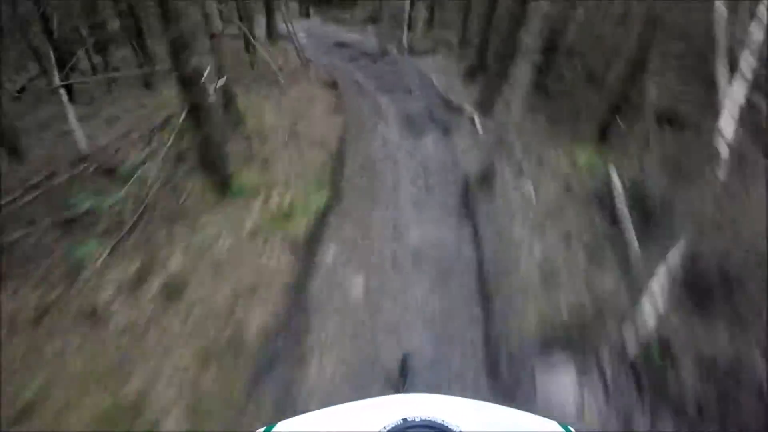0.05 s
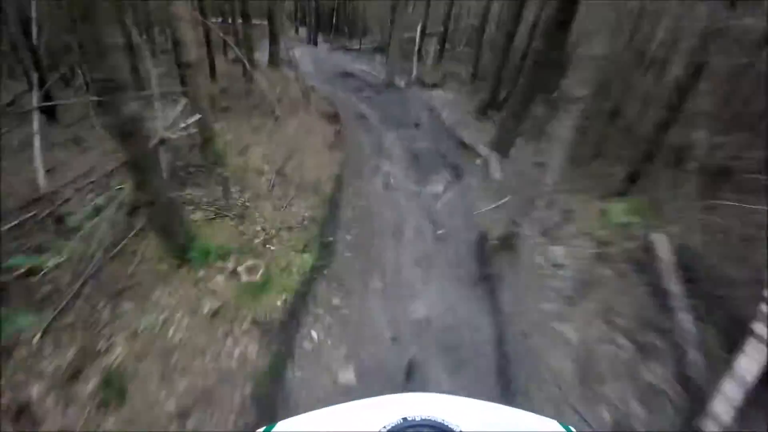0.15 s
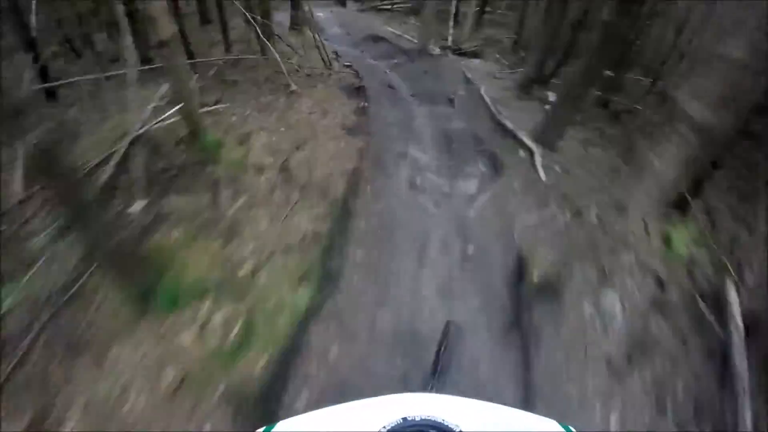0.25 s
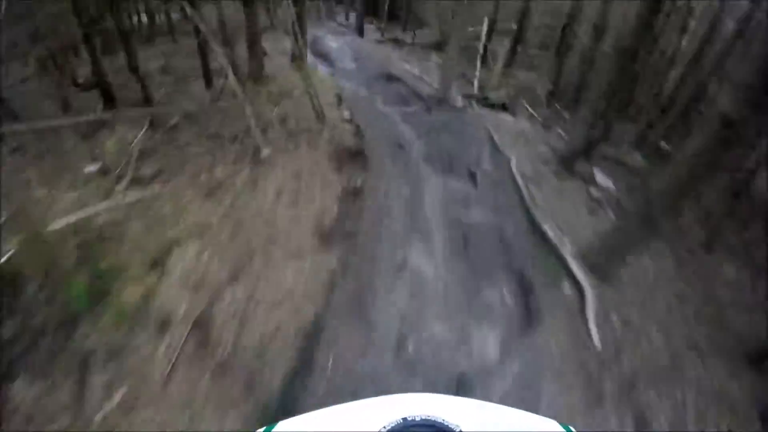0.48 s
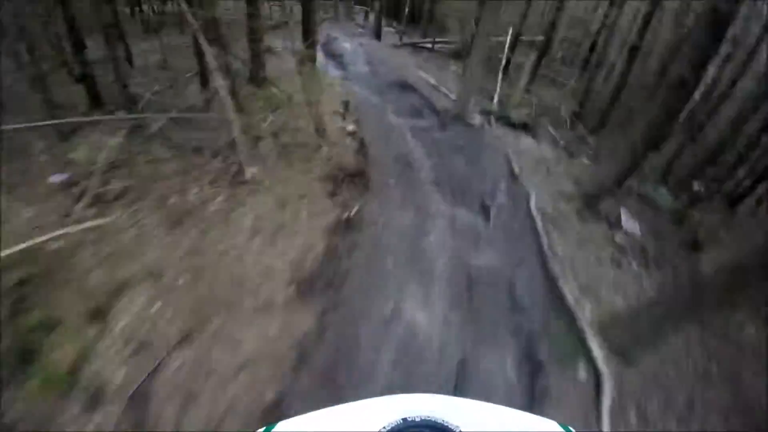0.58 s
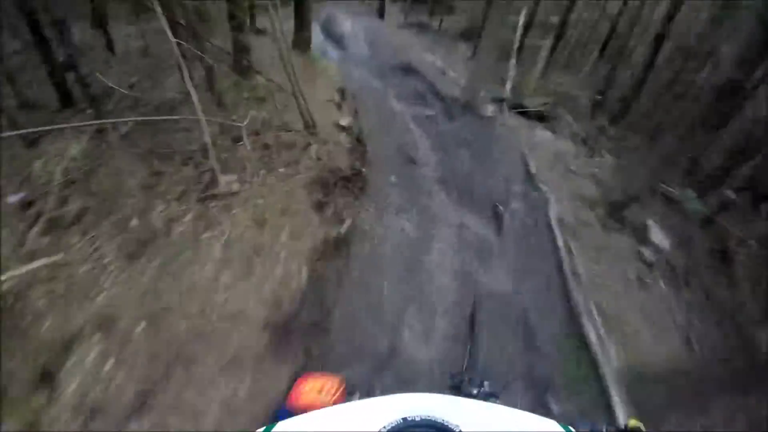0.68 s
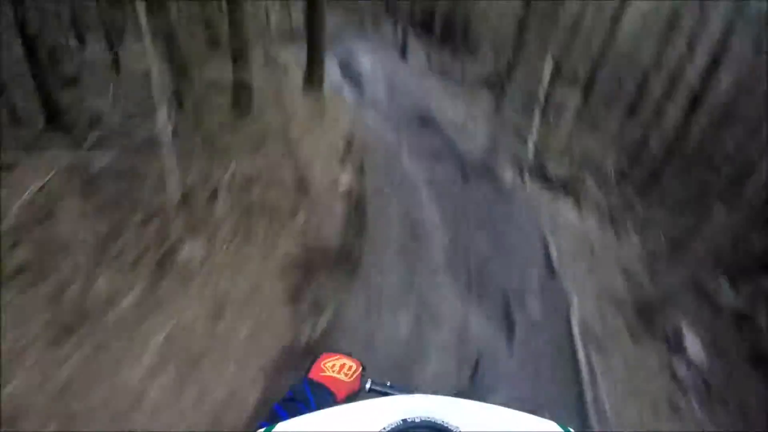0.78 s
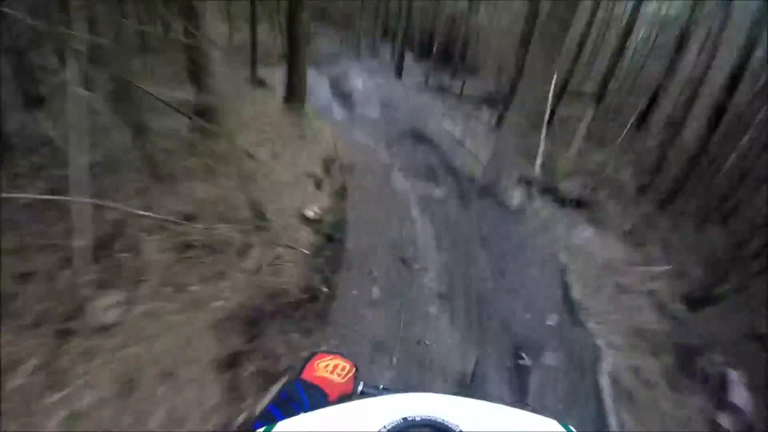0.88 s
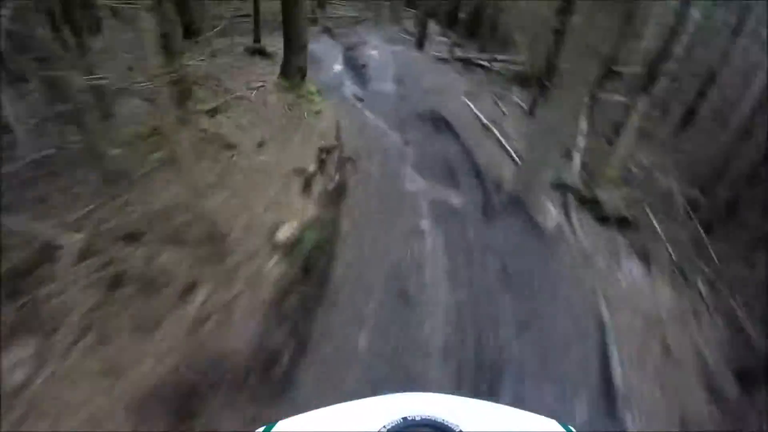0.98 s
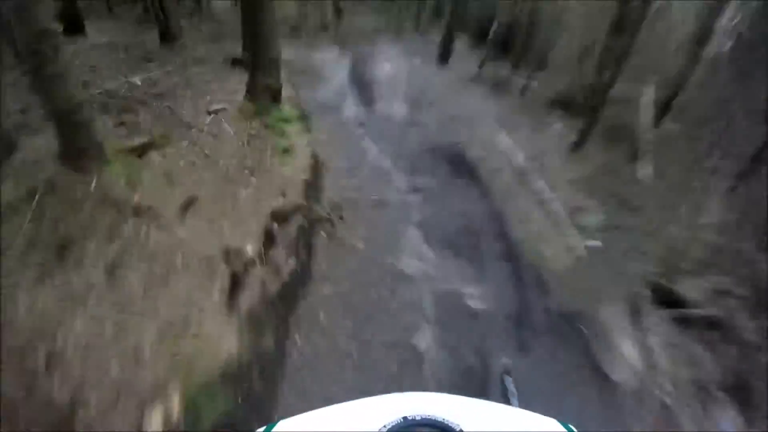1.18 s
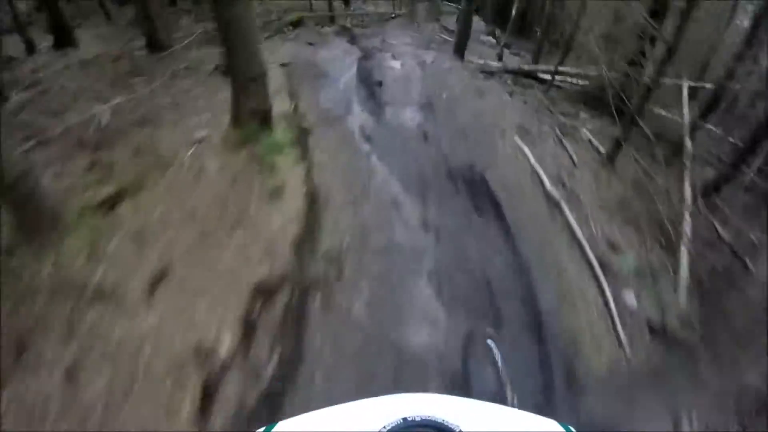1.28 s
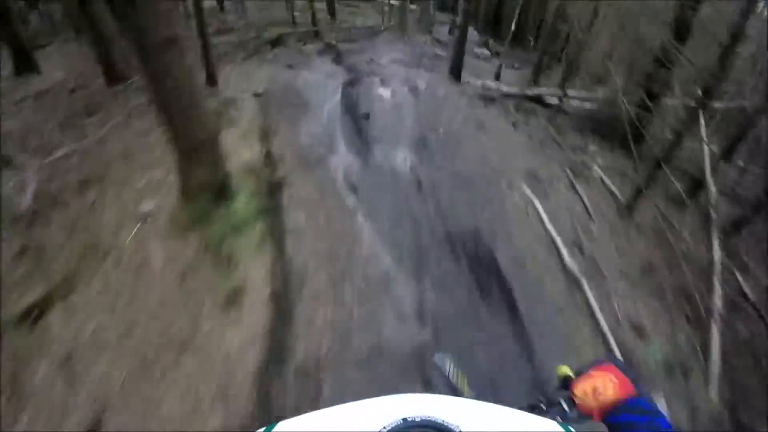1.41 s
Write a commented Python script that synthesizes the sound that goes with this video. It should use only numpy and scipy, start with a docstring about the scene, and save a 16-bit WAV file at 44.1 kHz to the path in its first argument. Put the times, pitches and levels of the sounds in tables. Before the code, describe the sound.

A mountain bike rattles and clacks down a dirt trail, with tyre hiss and wind.

```python
"""A mountain bike rattles down a dirt trail, heard from a camera on the rider's helmet.
Chain, cables and fittings strike the frame over bumps; metal scrapes once and pings once.
The tyres hum on their knobs and hiss, swish and scuff over grit. Wind buffets the camera.
Short resonances of the camera case colour the clacks, hiss, swish and grit."""
import sys
import numpy as np
from scipy import signal
from scipy.fft import rfft, irfft
from scipy.io import wavfile

SR = 44100
rng = np.random.default_rng(int(sys.argv[2]) if len(sys.argv) > 2 else 0)


def store_wav(level_fs):
    """Save 16-bit WAV to argv[1]."""
    pcm = np.round(np.clip(np.atleast_2d(level_fs), -1, 1) * 32767)
    wavfile.write(sys.argv[1], SR, pcm.T.astype(np.int16))


N = 63945
TIME_S, FREQ_HZ = np.arange(N) / SR, np.fft.rfftfreq(N, 1 / SR)

# Hard and light strikes on the frame. Each row: start in seconds, body, treble and top in relative dB.
CLACKS = [(.1276, -8, -21, -10), (.1302, -47, -40, -43), (.1314, -19, -31, -19), (.2018, -19, -27, -46),
          (.8004, -16.5, -21, -64), (.8042, -15, -24.5, -25), (.8067, -29, -51, -52),
          (.8083, -17.5, -25.5, -69), (.8107, -24, -30, -50), (.8128, -22, -35, -44),
          (.9406, -15, -21, -19.5), (1.1273, -10, -14, -23), (1.1871, -11.5, -14, -12)]
TICKS = [(.0388, -49, -51, -29), (.7463, -38.5, -33, -29), (.7742, -35, -31.5, -31),
         (.8811, -35, -31, -21.5), (1.0697, -35, -37, -23), (1.1031, -36, -30.5, -18),
         (1.3867, -31.5, -28, -21.5), (1.4367, -33, -27.5, -20)]
# Strike band edges in Hz: body end, treble start, treble end, top start.
STRIKE_EDGES_HZ = (3780, 6500, 7040, 9600)
# Metal scrape: start in seconds, length in seconds, level in dB.
SCRAPE = (0.2875, 0.064, -43)
# Ping at a hard bump: start in seconds, length in seconds, level in dB, pitch in Hz.
PING = (1.143, .03, -46, 1288)
# Resonances of the scraped metal and the camera case. Each row: centre in Hz, width in Hz, gain in dB.
SCRAPE_MODES = [(1490, 430, -3.5), (2040, 190, 1.5), (2670, 160, 2.5), (3240, 140, 1), (3550, 130, 0),
                (3730, 230, -6), (4190, 120, -9), (6120, 150, -12)]
CASE_MODES = [(1624, 86, 5.5), (2593, 320, -6), (3550, 180, -3), (4140, 360, -6), (5000, 190, -3),
              (6260, 440, 3), (6880, 220, -8.5), (7930, 360, 1.5)]
# Tyre scuffs. Each row: start in seconds, length in seconds, level in dB.
SCUFFS = [(0.442, 0.02, -53.5), (0.525, .012, -49.5), (0.542, 0.038, -55.5), (0.621, 0.011, -52.5),
          (0.675, 0.015, -51.5), (1.071, 0.017, -45.5), (1.332, 0.022, -48), (1.408, .012, -49.5)]
# Tyre hum pitch. Each row: time in seconds, pitch in Hz.
HUM_PITCH = [(0, 235.3), (.25, 243.2), (.86, 233), (.92, 243.1), (1.07, 234.3), (1.2, 224.8), (1.45, 230.3)]
# Source envelopes. Each row: time in seconds, relative level in dB.
RING_LEVEL = [(0, -61), (.18, -60), (.36, -53.5), (.46, -78), (.65, -56), (.73, -68.5), (.95, -56),
              (1.08, -56), (1.16, -45.5), (1.22, -54), (1.29, -70), (1.345, -45.5), (1.39, -61.5),
              (1.45, -72)]
ROLL_LEVEL = [(0, -56.5), (.11, -48.5), (.2, -52), (.27, -53), (.36, -51.5), (.45, -56), (.56, -51.5),
              (.66, -53.5), (.73, -57.5), (.83, -54.5), (.92, -51.5), (.99, -52.5), (1.06, -51),
              (1.15, -47), (1.21, -49), (1.28, -56.5), (1.36, -53.5), (1.45, -56.5)]
HUM_LEVEL = [(0, -64.5), (.24, -58.5), (.3, -70), (.36, -49), (.4, -62), (.75, -65), (.82, -58.5),
             (.88, -50), (.94, -53.5), (.97, -65), (1.01, -48), (1.19, -51.5), (1.26, -65.5), (1.45, -78)]
RUB_LEVEL = [(.81, -69), (.845, -48.5), (.878, -43), (.9, -50.5), (.925, -51.5), (.96, -51), (1.0, -72)]
SWISH_LEVEL = [(0, -52.5), (.06, -51), (.13, -51.5), (.2, -48.5), (.27, -63.5), (.38, -69), (.45, -58),
               (.5, -66.5), (.85, -65.5), (.91, -50), (.98, -64), (1.08, -57), (1.17, -51), (1.25, -72),
               (1.45, -62.5)]
BUFFET_LEVEL = [(0, -33.5), (.09, -38), (.15, -38), (.23, -33), (.28, -44), (.355, -29), (.41, -39.5),
                (.46, -32.5), (.5, -31), (.545, -39), (.59, -24.5), (.72, -32.5), (.79, -19.5), (.835, -42),
                (.89, -32), (.925, -37.5), (.975, -21), (1.005, -35), (1.04, -20.5), (1.13, -24),
                (1.205, -16), (1.26, -27.5), (1.32, -39.5), (1.38, -29), (1.45, -41.5)]
ROAR_LEVEL = [(0.0, -55.5), (0.258, -57), (0.31, -58.5), (0.406, -58.5), (1.082, -56.5), (1.106, -57.5),
              (1.166, -57.5), (1.45, -58)]
# Source spectra. Each row: frequency in Hz, relative level in dB.
CLACK_SPECTRUM = [(100, -14.5), (350, -8), (800, -7.5), (1150, -10.5), (1700, -4.5), (2300, 0), (3700, -1),
                  (4800, -8.5), (5600, -5), (6600, -0.5), (7600, -3.5), (8700, -24.5), (11000, -28),
                  (15000, -41)]
TICK_SPECTRUM = [(100, -16), (1000, 1), (2500, 5), (4000, 7), (4900, -8.5), (6400, -5.5), (7000, -3),
                 (7700, -5.5), (9200, -15.5), (10500, -26.5), (15000, -48)]
HISS_SPECTRUM = [(530, -21), (900, -18), (1100, -9.5), (1350, -2), (1640, 1), (1830, -2.5), (1970, 4),
                 (2190, -6.5), (2570, 5.5), (2960, -19), (3260, -5.5), (3900, -8), (4400, -12), (4900, -20),
                 (6180, -18.5), (7600, -20.5), (8600, -28.5), (12500, -34), (15000, -64), (16000, -69)]
GRIT_SPECTRUM = [(200, -39), (1100, -15.5), (1700, -1), (2600, 7), (3900, 5.5), (4700, -8.5), (6200, -8),
                 (8500, -22), (12000, -30), (15000, -57)]
SWISH_SPECTRUM = [(1200, -30), (2100, -7.5), (2450, 7), (2700, 7.5), (2950, -8.5), (3300, -1.5),
                  (3950, -5.5), (4500, -29), (6300, -32), (8500, -48), (14000, -60)]
BUFFET_SPECTRUM = [(6, -6), (14, 7.5), (24, -2), (34, -9.5), (52, -5), (62, -14), (78, -14.5), (130, -43),
                   (400, -88)]
ROAR_SPECTRUM = [(30, -34), (90, -1), (150, -0.5), (200, -7), (320, -11), (500, -14.5), (1000, -20),
                 (1600, -67), (5000, -45)]


def rattle(gain_db=10):
    """Chain, cables and fittings strike the frame over bumps."""
    out = np.zeros(N)
    for strikes, spectrum in ((CLACKS, CLACK_SPECTRUM), (TICKS, TICK_SPECTRUM)):
        for start_s, *bands_db in strikes:
            add(out, start_s, amp(gain_db) * strike(spectrum, *bands_db))
    return out


def strike(spectrum, body_db, treble_db, top_db, echo_s=0.000783, decay_s=0.0016):
    """Hard contact: a click, one close reflection, a few milliseconds of dense ringing."""
    t = np.arange(700) / SR
    click = t == 0
    echo = 0.22 * np.sinc((t - echo_s) * SR)
    ring = rng.standard_normal(len(t)) * np.exp(-t / decay_s) * np.minimum(t / echo_s, 1)
    blow = click + echo + 0.89 * ring / np.linalg.norm(ring)
    tilt = list(zip(STRIKE_EDGES_HZ, (body_db, treble_db, treble_db, top_db)))
    response = case_impulse(lambda hz: spectrum_db(spectrum, hz) + spectrum_db(tilt, hz))
    return signal.fftconvolve(blow, response)


def metal_scrape():
    """A scrape sets several metal resonances ringing."""
    start_s, length_s, level_db = SCRAPE
    modes = sum(amp(db) * steady(band(hz, width_hz), amount=0.66) for hz, width_hz, db in SCRAPE_MODES)
    return amp(level_db) * swell(start_s, length_s, skew=0.38) ** 2 * unit_rms(modes)


def bike_ping():
    """The bike rings briefly on one tone at a hard bump."""
    start_s, length_s, level_db, hz = PING
    return amp(level_db) * swell(start_s, length_s, skew=0.32) * np.sin(2 * np.pi * hz * TIME_S)


def bike_ring(gain_db=-1):
    """One thin resonance of the bike swells and fades."""
    return amp(gain_db) * envelope(RING_LEVEL) * steady(band(hz=1659, width_hz=77), amount=0.1)


def tyre_roll(hiss_db=-1, grit_db=-17):
    """Rolling tread hisses over sparse grit."""
    hiss = noise(amp(spectrum_db(HISS_SPECTRUM, FREQ_HZ) + case_db(FREQ_HZ)))
    return envelope(ROLL_LEVEL) * (amp(hiss_db) * hiss + amp(grit_db) * grit(grains_per_s=320))


def tyre_hum(gain_db=0.5, width_hz=36.5):
    """Tread knobs drone, wavering about a pitch set by wheel speed."""
    phase = 2 * np.pi * np.cumsum(np.interp(TIME_S, *np.transpose(HUM_PITCH))) / SR
    drone = band(0, width_hz) * np.cos(phase) + band(0, width_hz) * np.sin(phase)
    return amp(gain_db) * envelope(HUM_LEVEL) * steady(unit_rms(drone), amount=0.97)


def tyre_rub():
    """A tyre rubs sideways through the bend."""
    return envelope(RUB_LEVEL) * band(hz=2475, width_hz=530)


def tyre_swish():
    """Tread brushes through loose dirt."""
    return envelope(SWISH_LEVEL) * noise(amp(spectrum_db(SWISH_SPECTRUM, FREQ_HZ) + case_db(FREQ_HZ)))


def tyre_scuffs():
    """Tyres throw short sprays of dense grit."""
    sprays = sum(amp(db) * swell(start_s, length_s, skew=0.6) for start_s, length_s, db in SCUFFS)
    return sprays * grit(grains_per_s=2500)


def grit(grains_per_s):
    """Dirt grains crackle under the tread: equal clicks, random in time and sign."""
    grains = (rng.random(N) < grains_per_s / SR) * rng.choice([-1, 1], N)
    click = case_impulse(lambda hz: spectrum_db(GRIT_SPECTRUM, hz))
    return unit_rms(signal.fftconvolve(grains, click)[:N])


def wind(cutoff_hz=66, roar_db=1):
    """Air buffets the camera: deep thumps under a faint roar."""
    turbulence = noise(amp(spectrum_db(BUFFET_SPECTRUM, FREQ_HZ)))
    gusts = envelope(BUFFET_LEVEL) * steady(turbulence, amount=0.35)
    lowpass = 1 / (1 + (np.fft.rfftfreq(2 * N, 1 / SR) / cutoff_hz) ** 14)
    buffet = irfft(rfft(gusts, 2 * N) * lowpass)[:N]
    roar = envelope(ROAR_LEVEL) * noise(amp(spectrum_db(ROAR_SPECTRUM, FREQ_HZ)))
    return buffet + amp(roar_db) * roar


def case_db(hz):
    """Peaks and notches of the camera case."""
    return sum(db * resonance(hz, centre_hz, width_hz) for centre_hz, width_hz, db in CASE_MODES)


def case_impulse(db_at_hz):
    """Minimum-phase click of a given spectrum, heard through the case."""
    hz = abs(np.fft.fftfreq(2048, 1 / SR))
    log_gain = np.log(amp(db_at_hz(hz) + case_db(hz)))
    return np.fft.ifft(np.exp(np.conj(signal.hilbert(log_gain)))).real


def resonance(hz, centre_hz, width_hz):
    """Bell curve, peak 1, full width at half height."""
    return 1 / (1 + (2 * (hz - centre_hz) / width_hz) ** 2)


def band(hz, width_hz):
    """Noise in one resonance."""
    return noise(resonance(FREQ_HZ, hz, width_hz))


def noise(gain):
    """Random-phase noise shaped by a gain per frequency, rms 1."""
    return unit_rms(irfft(gain * np.exp(2j * np.pi * rng.random(len(FREQ_HZ))), N))


def steady(x, amount):
    """Evens out part of a narrow noise's random fading."""
    return unit_rms(x / (abs(signal.hilbert(x)) + 0.5) ** amount)


def swell(start_s, length_s, skew):
    """One arch of gain; skew below 1 moves the peak earlier."""
    return np.sin(np.pi * np.clip((TIME_S - start_s) / length_s, 0, 1) ** skew)


def envelope(points):
    """Gain per sample from a dB curve."""
    return amp(np.interp(TIME_S, *np.transpose(points)))


def spectrum_db(points, hz):
    """Interpolates a spectrum over log frequency."""
    points_hz, db = np.transpose(points)
    return np.interp(np.log(hz + 1), np.log(points_hz + 1), db)


def amp(db):
    """dB to gain."""
    return 10 ** (np.asarray(db) / 20)


def unit_rms(x):
    """Scales to rms 1."""
    return x / np.sqrt(np.mean(x ** 2) + 1e-20)


def add(mix, start_s, sound):
    """Mixes a sound in place."""
    part = mix[round(start_s * SR):][:len(sound)]
    part += sound[:len(part)]


def scene():
    """Bike, tyres and wind in mono."""
    bike = rattle() + metal_scrape() + bike_ping() + bike_ring()
    tyres = tyre_roll() + tyre_hum() + tyre_rub() + tyre_swish() + tyre_scuffs()
    return (bike + tyres + wind())[None]


def record(dry):
    """The camera's band limit."""
    cutoff_hz = 16000
    lowpass = signal.firwin(255, cutoff_hz, window=("kaiser", 8), fs=SR)
    return signal.oaconvolve(dry, lowpass[None], "same")


dry = scene()
out = record(dry)
store_wav(out)
```